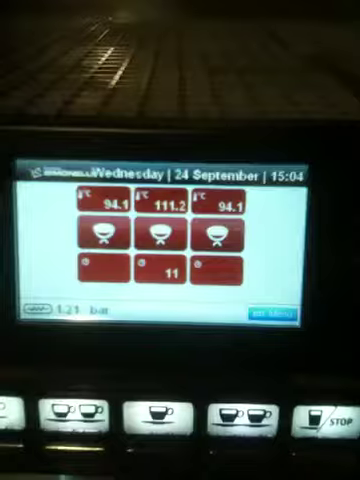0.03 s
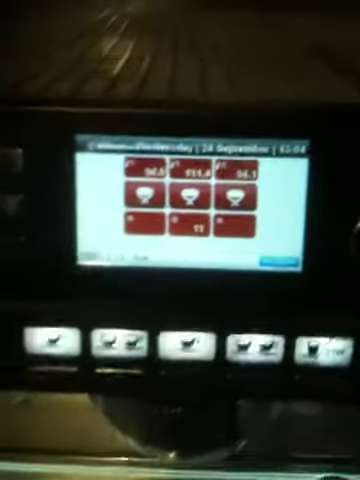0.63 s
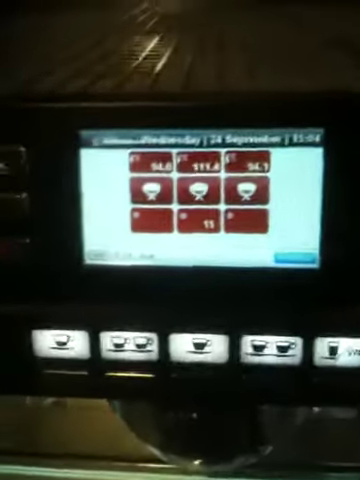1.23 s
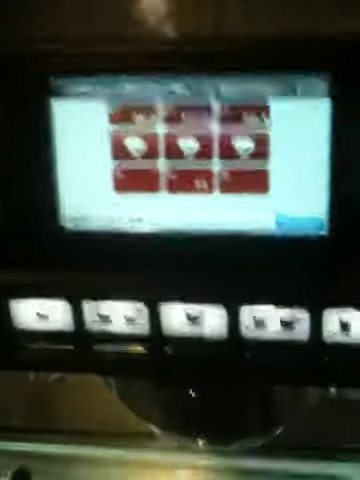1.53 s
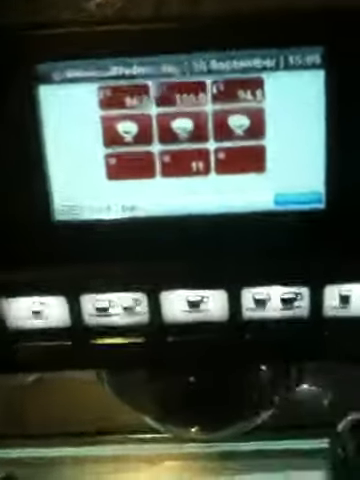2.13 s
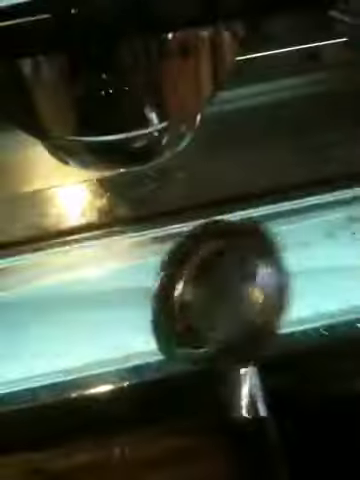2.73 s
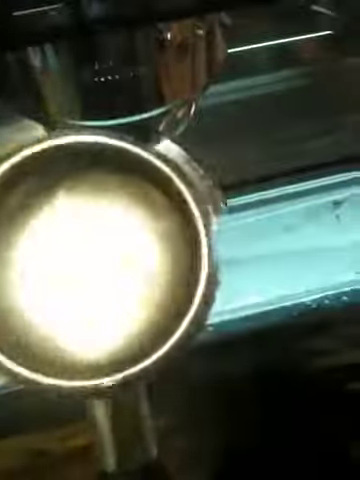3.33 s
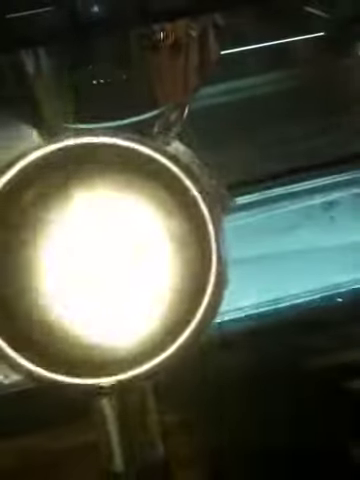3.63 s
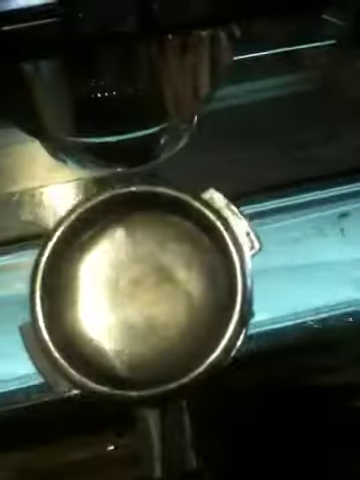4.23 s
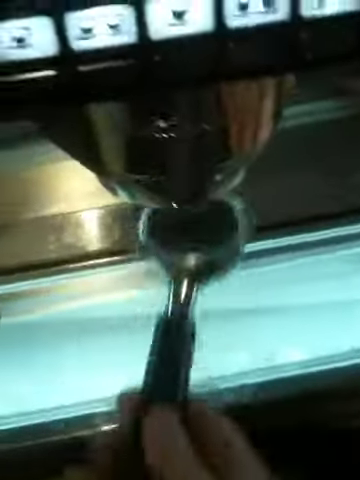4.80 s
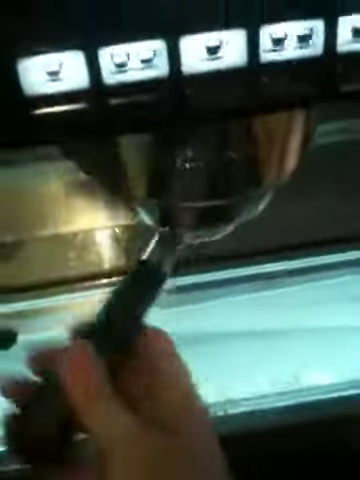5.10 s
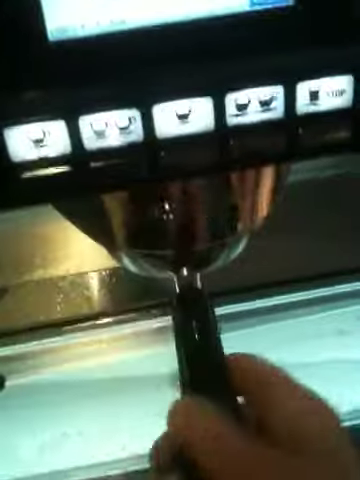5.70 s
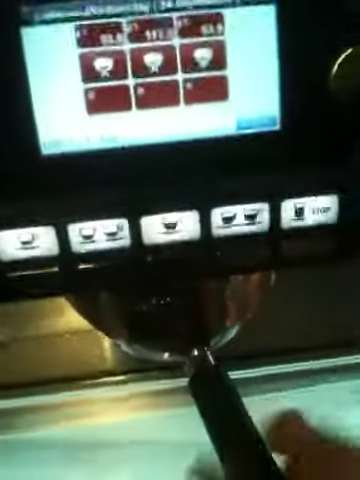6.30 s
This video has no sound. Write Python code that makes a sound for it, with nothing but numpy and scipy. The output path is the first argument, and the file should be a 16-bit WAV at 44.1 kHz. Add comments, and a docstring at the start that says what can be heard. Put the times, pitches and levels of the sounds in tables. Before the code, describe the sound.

A quiet electrical hum and soft fan air from an espresso machine run throughout, in a hard-walled room with a short reverb. At about 1.3 seconds a hand makes a few soft, dull knocks, followed by a very faint rub. A small switch gives a bright double click at 1.7 seconds. At 1.8 seconds something heavy thuds and scuffs on the counter, a little further off, and loose metalware jangles and rings briefly. One soft knock comes at 2.7 seconds, then just the hum. At about 5.1 seconds a metal portafilter hits the machine's group head close to the microphone with a sharp, ringing clank, the loudest sound. Quick scrapes and smaller clanks follow as it drops into its slots around 5.3 to 5.4 seconds. A softer clunk near 5.7 seconds wedges it tight, and the hum continues until the end, just past 6 seconds.

```python
"""A portafilter clanks up into an espresso machine's group head, close by in a hard-walled room.
Its lugs scrape, drop into their slots and wedge tight as the handle is pulled; the ring changes each time.
Earlier, something heavy bumps the counter and loose metalware jangles. Each of these hits is a crack
plus ringing modes. A switch clicks, a hand nudges and rubs, and mains hum and fan air run underneath."""
import sys
import numpy as np
from scipy import signal
from scipy.fft import rfft, irfft
from scipy.io import wavfile

SR = 44100
rng = np.random.default_rng(int(sys.argv[2]) if len(sys.argv) > 2 else 0)


def generate_wav(signal):
    """Clip the signal to [-1, 1] and save it as 16-bit WAV at the path in sys.argv[1]."""
    frames = np.transpose(np.atleast_2d(signal))
    scaled = np.clip(frames, -1, 1) * 32767
    pcm = np.round(scaled).astype(np.int16)
    wavfile.write(sys.argv[1], SR, pcm)


N = 280035
TAPS = 8192
HZ = np.fft.rfftfreq(TAPS, 1 / SR)  # frequency grid of the EQ curves


def gain_of(db):
    """Decibels to amplitude."""
    return 10 ** (np.asarray(db) / 20)


def unit_rms(x):
    """Scales to rms 1."""
    return x / np.sqrt(np.mean(x ** 2) + 1e-20)


def curve(points, hz):
    """Reads a breakpoint table along a log-frequency axis."""
    point_hz, value = np.transpose(points)
    return np.interp(np.log(hz + 1), np.log(point_hz + 1), value)


def add(mix, start_s, sound):
    """Lays a sound into the mix."""
    part = mix[round(start_s * SR):][:len(sound)]
    part += sound[:len(part)]


def eq(x, curve_db):
    """Minimum-phase EQ with the given gain at each of HZ."""
    log_gain = np.log(gain_of(np.maximum(curve_db, -100)))
    mirrored = np.concatenate([log_gain, log_gain[-2:0:-1]])
    kernel = np.fft.ifft(np.exp(np.conj(signal.hilbert(mirrored)))).real
    return signal.fftconvolve(x, kernel[:TAPS // 2])[:len(x)]


def bell(centre_hz, octaves):
    """A bell curve in dB, 3 dB down this many octaves either side."""
    return -3 * (np.log2((HZ + 1) / centre_hz) / octaves) ** 2


def shelves(bass_db, treble_db, bass_hz=650, treble_hz=2600):
    """Tone of a contact in dB: a heavy one adds bass, a hard one treble."""
    return bass_db / (1 + (HZ / bass_hz) ** 4) + treble_db / (1 + (treble_hz / (HZ + 1)) ** 4)


def damped(x, decay):
    """Each frequency of x dies away with its own t60."""
    hz, t, bands = signal.stft(x, SR, nperseg=256)
    fade = gain_of(-60 * t / curve(decay, hz)[:, None])
    return signal.istft(bands * fade, SR, nperseg=256)[1][:len(x)]


def steady_noise(gain):
    """Noise of rms 1 whose spectrum follows gain(hz)."""
    spectrum = rfft(rng.standard_normal(N)) * gain(np.fft.rfftfreq(N, 1 / SR))
    return unit_rms(irfft(spectrum, N))


def tap(colour_db, decay_s):
    """A light touch: a fast-dying noise burst of peak 1."""
    envelope = np.exp(-np.arange(TAPS) / SR / decay_s)
    sound = eq(rng.standard_normal(TAPS) * envelope, colour_db)
    return sound / abs(sound).max()


def struck(hits, colour, decay, modes, crack_s=0.0009, swell_s=0.0022):
    """Each hit is a crack, a dense ring and clear modes; slide runs from 0 (square hit) to 1 (scrape)."""
    out, t = np.zeros(N), np.arange(SR) / SR
    body_db = curve(colour, HZ)
    body_db -= 10 * np.log10(np.mean(gain_of(body_db) ** 2))
    # neighbouring modes swing in opposite directions
    clear = sum((-1) ** k * gain_of(db - 60 * t / t60_s) * np.sin(2 * np.pi * hz * t)
                for k, (hz, db, t60_s) in enumerate(modes))
    burst = np.exp(-(t / crack_s) ** 2)
    for start_s, level_db, bass_db, treble_db, slide in hits:
        # sliding softens the crack, mutes the clear modes and slows the attack
        crack_db, clear_db = 10 - 23 * slide, 2 - 16.5 * slide
        attack = 1 - np.exp(-t / max(swell_s * slide, 1e-4))
        crack = eq(burst * rng.choice([-1., 1.], SR), body_db)
        crack *= gain_of(crack_db) * np.linalg.norm(burst) / np.linalg.norm(crack)
        dense = eq(damped(rng.choice([-1., 1.], SR), decay), body_db)
        sound = crack + attack * (dense + gain_of(clear_db) * clear)
        add(out, start_s, gain_of(level_db) * eq(sound, shelves(bass_db, treble_db)))
    return out


def room(x, delay_s=0.0025, build_s=0.0025):
    """Diffuse reflections off hard walls build up, then die band by band."""
    # reverb time: band_hz, t60_s
    decay = [(150, 0.53), (500, 0.74), (1500, 0.54), (4000, 0.54), (8000, 0.41), (15000, 0.65)]
    t = np.arange(SR) / SR
    attack = 1 - np.exp(-np.maximum(t - delay_s, 0) / build_s)
    tail = damped(rng.standard_normal(SR), decay) * attack
    return signal.fftconvolve(x, tail / np.linalg.norm(tail))[:N]


def fan_air(bed_db=-58):
    """Moving air makes a noise bed and sounds the casing's resonances."""
    # fan and room tone: band_hz, relative_db
    colour = [(20, -39), (60, -23.5), (100, -11.5), (125, -6), (150, 0), (175, -1), (240, 1.5), (295, -1.5),
              (400, 2.5), (500, -3), (800, -5), (1400, -11.5), (2200, -19), (4500, -25.5), (9000, -31),
              (15500, -32.5)]
    # casing resonances: pitch_hz, half_width_hz, level_db
    resonances = [(191.2, 3.4, -60.5), (211.5, 6, -65), (240.4, 16.3, -61), (342.7, 14.5, -67),
                  (446, 17, -71.5), (2810, 108, -83.5)]
    air = gain_of(bed_db) * steady_noise(lambda f: gain_of(curve(colour, f)))
    for pitch_hz, half_width_hz, level_db in resonances:
        air += gain_of(level_db) * steady_noise(lambda f: 1 / (1 + ((f - pitch_hz) / half_width_hz) ** 2))
    return air


def machine_hum(waver_rad=0.041, waver_hz=3):
    """Mains hum and fan tones; the motor's speed wanders, so higher tones waver more in phase."""
    # hum tones: pitch_hz, level_db
    tones = [(100, -65.5), (599, -70), (700, -76), (2897, -81.5), (2993, -89), (3717, -90.5)]
    t = np.arange(N) / SR
    lowest_hz = tones[0][0]
    drift = waver_rad * steady_noise(lambda f: np.exp(-(f / waver_hz) ** 2)) / lowest_hz
    return sum(gain_of(db) * np.sqrt(2) * np.sin(hz * (2 * np.pi * t + drift)) for hz, db in tones)


def hand_rubs():
    """Skin friction gives faint swells of hiss."""
    # strokes of the hand: start_s, level_db, length_s
    rubs = [(1.5, -72.5, .076), (1.748, -67, 0.12), (3.274, -72, .056)]
    out, t = np.zeros(N), np.arange(TAPS) / SR
    for start_s, level_db, length_s in rubs:
        hiss = unit_rms(eq(rng.standard_normal(TAPS), bell(centre_hz=4800, octaves=0.44)))
        swell = np.sin(np.pi * np.minimum(t / length_s, 1))
        add(out, start_s, gain_of(level_db) * hiss * swell)
    return out


def hand_nudges():
    """Soft touches give short, dull knocks."""
    # nudges: start_s, peak_db, centre_hz, decay_s
    nudges = [(1.256, -41.5, 755, .01), (1.274, -42, 786, 0.017), (1.289, -45, 370, .049),
              (2.701, -37.5, 240, 0.0033)]
    out = np.zeros(N)
    for start_s, peak_db, centre_hz, decay_s in nudges:
        add(out, start_s, gain_of(peak_db) * tap(bell(centre_hz, octaves=0.57), decay_s))
    return out


def switch_clicks():
    """A small switch snaps twice, bright and dry."""
    # clicks: start_s, peak_db
    clicks = [(1.6825, -47), (1.692, -40)]
    # tone of the switch: band_hz, relative_db
    colour = [(1500, -20), (2400, -7), (3300, 1), (4600, -11), (6000, -3), (7800, -5), (10000, -19),
              (15000, -30)]
    out = np.zeros(N)
    for start_s, peak_db in clicks:
        add(out, start_s, gain_of(peak_db) * tap(curve(colour, HZ), decay_s=0.0016))
    return out


def metalware_jangle():
    """Loose metal pieces knock together and ring on."""
    # jangles: start_s, level_db, bass_db, treble_db, slide
    hits = [(1.905, -43, -8, 6.5, 0.8), (1.9185, -36.5, -8, -2.5, 0.09)]
    # tone of the metalware: band_hz, relative_db
    colour = [(100, -33), (350, -19), (650, -13), (1100, 5), (1700, 0), (2300, -4.5), (3400, -8.5),
              (4700, -12), (7000, -14.5), (10000, -24.5), (15500, -43)]
    # length of its dense ring: band_hz, t60_s
    decay = [(300, 0.089), (1400, 0.25), (4000, 0.23), (12000, 0.17)]
    # its clear modes: pitch_hz, level_db, t60_s
    modes = [(902, -16, 0.6), (1000, -14, 0.37), (1020, -0.5, 0.22), (1195, -7, .76), (1464, -7.5, .8),
             (1646, -10, .4), (1680, -8, .68), (1803, -11, .48), (1895, -11, .53), (2610, -9, 0.31),
             (2972, -12, 0.36), (4730, -12, 0.21), (5464, -20, 0.19)]
    return struck(hits, colour, decay, modes)


def counter_bump():
    """Something heavy lands on the counter with a thud, then a scuff."""
    # knocks: start_s, level_db, bass_db, treble_db, slide
    hits = [(1.832, -31, -1, -8.5, 0.11), (1.875, -38, -6, 3.5, 0.9)]
    # tone of the counter: band_hz, relative_db
    colour = [(60, -30), (120, -14), (180, 3), (400, 3.5), (540, -6), (800, -9), (1150, -3.5), (1600, -6.5),
              (2300, -18), (4800, -20), (9000, -33), (15500, -49)]
    # length of its dense ring: band_hz, t60_s
    decay = [(200, 0.18), (1200, 0.41), (5000, 0.53), (14000, 0.21)]
    # its clear modes: pitch_hz, level_db, t60_s
    modes = [(178.3, 1.5, 0.26), (258, -1.5, 0.1), (394, -6, 0.57), (980, -15, .23), (1156, -4.5, 0.18),
             (1236, -13, .4), (4740, -22, 0.15)]
    return struck(hits, colour, decay, modes)


def portafilter(seated_s=5.356, wedged_s=5.63):
    """Metal hits metal; the group head's modes change as the lugs go from loose to seated to wedged."""
    # clank, scrapes, drop and final pull: start_s, level_db, bass_db, treble_db, slide
    hits = [(5.06, -17.5, -6.5, 1, .13), (5.0668, -31, -1.5, 0, 0.27), (5.104, -27.5, -1, 2, 0.51),
            (5.141, -29, -7, -6.5, 0.27), (5.2446, -33.5, 0, 2.5, 0.77), (5.2981, -25.5, -5, -4.5, 0.23),
            (5.3078, -32, -0.5, 8.5, 0.47), (5.349, -52, 16, -16, 0.076), (5.3624, -31, -3, -4.5, 0.14),
            (5.384, -31, -20, -16, .5), (5.49, -46, -3, -7, .6), (5.587, -49, 8, -10, 0.75),
            (5.663, -50.5, -8, -3, 0.024), (5.669, -40.5, 2, -7.5, 0.31)]
    # tone of the group head with the portafilter: band_hz, relative_db
    colour = [(60, -18), (130, -16.5), (220, -4), (320, -6), (440, -8), (600, -4), (900, -10), (1250, 5),
              (1800, 0), (2400, -7), (3700, -6), (5500, -13.5), (9000, -26.5), (15500, -46)]
    # length of its dense ring: band_hz, t60_s
    decay = [(200, 0.6), (600, 0.34), (1400, 0.11), (3500, 0.11), (7000, 0.18), (14000, 0.071)]
    # clear modes while loose: pitch_hz, level_db, t60_s
    loose_modes = [(192, -24.5, 0.26), (234, -15, 0.61), (442.7, -9, .25), (811, -17, 0.33),
                   (1060, -18.5, 0.28), (1125, -9.5, 0.325), (1173, -20, 0.296), (1303, -12, .28),
                   (1285, -12, 0.16), (1450, -17, 0.24), (1430, -17, 0.28), (1566, -10.5, 0.17),
                   (1720, -17, 0.15), (1958, -21, .26), (2420, -23.5, 0.19), (2770, -16, .08),
                   (3040, -27, 0.14), (3387, -19, .16), (3620, -14, 0.11), (3840, -27, .18),
                   (4161, -26, .3), (4393, -25.5, 0.21), (4470, -16, 0.26), (5530, -21, 0.15),
                   (6300, -23, .18)]
    # with the lugs in their slots: pitch_hz, level_db, t60_s
    seated_modes = [(440, -1, 0.17), (725, -1.5, 0.07), (1351, -10.5, 0.41), (1760, -13, 0.22),
                    (1990, -5.5, 0.25), (1895, -6.5, 0.21), (2530, -7, 0.089), (2700, 0, 0.058),
                    (3250, -26, 0.15), (3330, -24, 0.18)]
    # clamped against the gasket: pitch_hz, level_db, t60_s
    wedged_modes = [(189.7, -11, 0.44), (445.3, 5.5, 0.15), (1150, 0.5, 0.14), (1335, 0.5, 0.087),
                    (1460, -14, 0.24), (3204, 5, 0.061), (3900, 0, 0.089)]
    stages = [(0, seated_s, loose_modes), (seated_s, wedged_s, seated_modes),
              (wedged_s, np.inf, wedged_modes)]
    out = np.zeros(N)
    for start_s, end_s, modes in stages:
        stage_hits = [hit for hit in hits if start_s <= hit[0] < end_s]
        out += struck(stage_hits, colour, decay, modes)
    return out


def scene(near_send_db=-10, far_send_db=-7, low_cut_hz=95):
    """The group head is close; the counter and metalware stand further off, with more reverb."""
    near = portafilter()
    far = counter_bump() + metalware_jangle()
    reverb = room(gain_of(near_send_db) * near + gain_of(far_send_db) * far)
    handling = switch_clicks() + hand_nudges() + hand_rubs()
    # small objects radiate almost no deep bass
    low_cut = signal.butter(2, low_cut_hz, "high", fs=SR, output="sos")
    foley = signal.sosfilt(low_cut, near + far + reverb + handling)
    return (foley + fan_air() + machine_hum())[None]


def record(dry, high_cut_hz=15850):
    """A small microphone with a steep band limit."""
    high_cut = signal.firwin(511, high_cut_hz, window=("kaiser", 9), fs=SR)
    return signal.oaconvolve(dry, high_cut[None], "same")


dry = scene()
out = record(dry)
generate_wav(out)
```